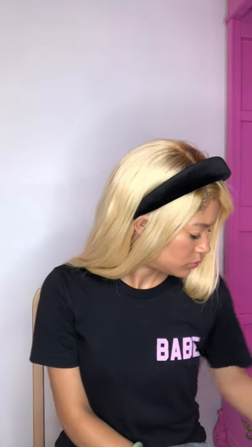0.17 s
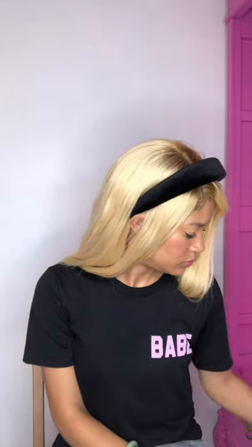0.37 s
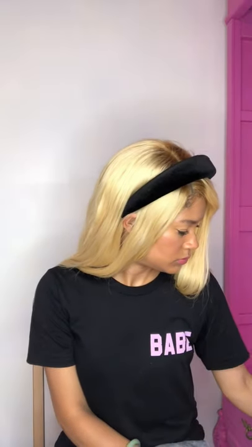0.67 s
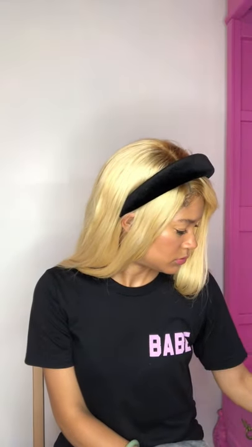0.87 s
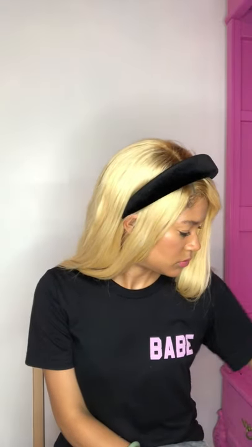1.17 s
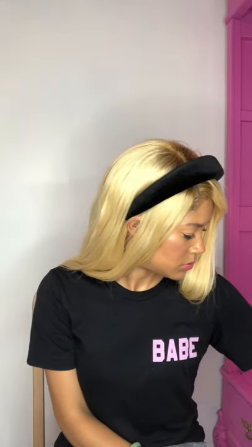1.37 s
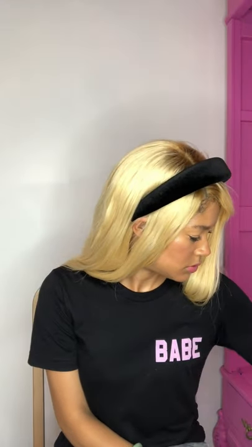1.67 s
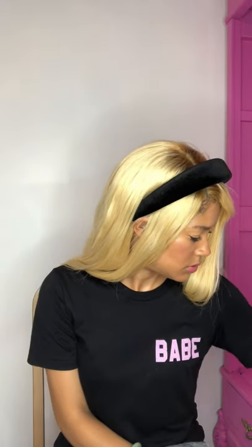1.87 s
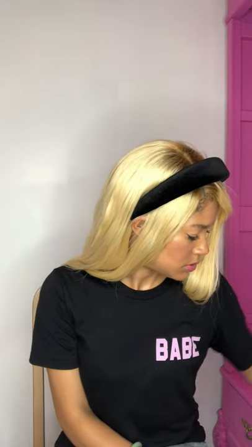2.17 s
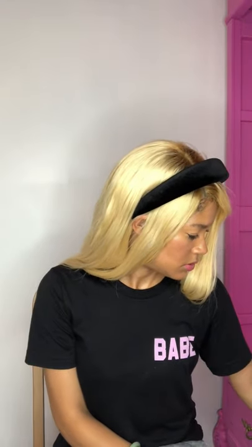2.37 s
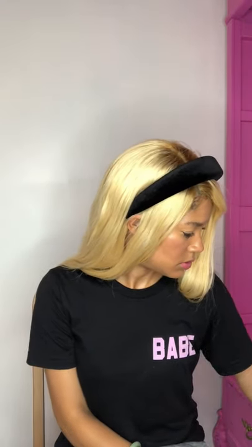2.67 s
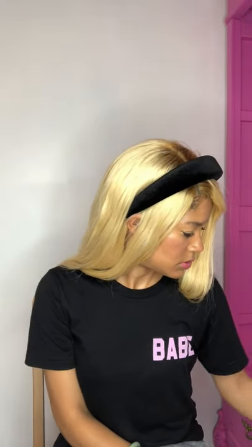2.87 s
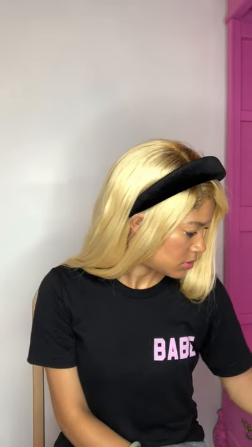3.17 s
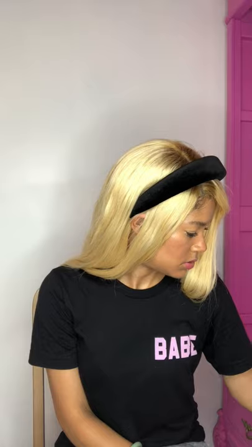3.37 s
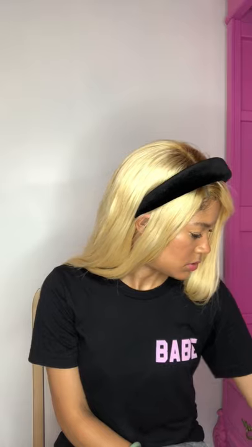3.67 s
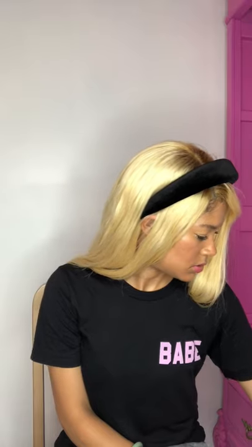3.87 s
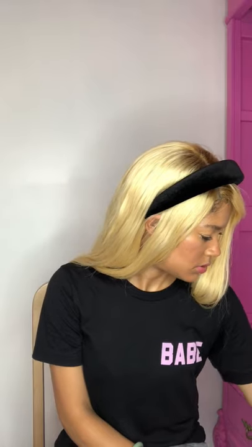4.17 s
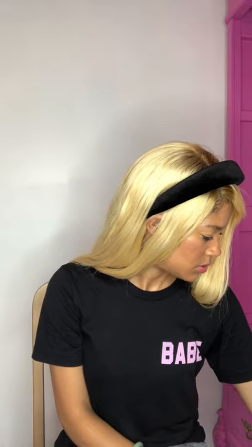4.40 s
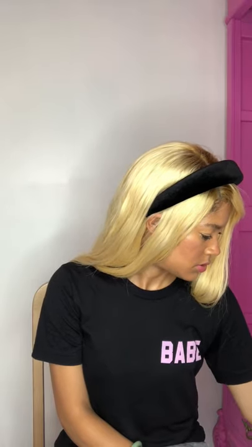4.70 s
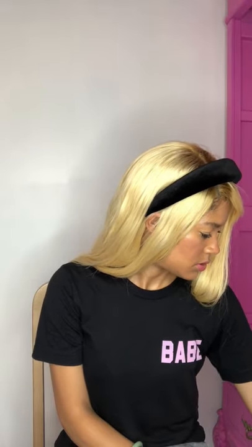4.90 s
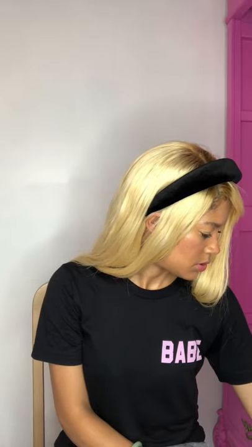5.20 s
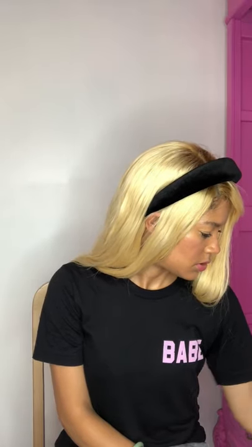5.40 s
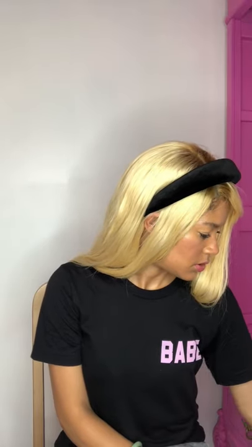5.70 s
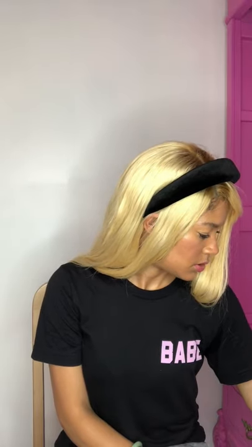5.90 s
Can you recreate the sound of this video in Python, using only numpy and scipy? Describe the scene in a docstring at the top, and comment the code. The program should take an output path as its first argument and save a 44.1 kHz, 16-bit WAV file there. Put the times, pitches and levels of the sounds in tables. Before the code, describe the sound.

A hand works at a small fridge. After light touches, a hard crack rings its panels and hollow cabinet, with about a second of bright room tail. Groups of knocks, scrapes, packet rustles and tiny hard ticks follow, separated by near-quiet pauses. The second big cluster peaks in a firm thump, and the last ends in crisp crinkling. Quiet air hiss and wavering low hum continue, heard at moderate distance.

```python
"""A bare, ringing room: a hand opens a small fridge and moves things about inside it.
Knocks are decaying modes of the struck thing, panels and hollow cabinet, rung by runs of contacts.
Random stick-slip grains make things slide, rustle and crinkle; small hard items tick in noise-like snaps.
Band-by-band dying noise is the room's tail of about a second; filtered noise is the low hum and quiet hiss."""
import sys
import numpy as np
from scipy import signal
from scipy.fft import rfft, irfft, next_fast_len
from scipy.io import wavfile

SR = 44100
rng = np.random.default_rng(int(sys.argv[2]) if len(sys.argv) > 2 else 0)


def bounce(signal):
    """Save signal as a 16-bit WAV file at the path given by the first command-line argument."""
    frames = np.transpose(np.atleast_2d(signal))
    limited = np.clip(frames, -1, 1)
    pcm = np.round(limited * 32767).astype(np.int16)
    wavfile.write(sys.argv[1], SR, pcm)


def voltage_ratio(decibels):
    """Convert decibels (scalar or array-like) to amplitude ratios, 20 dB per decade."""
    exponent = np.asarray(decibels, float) / 20
    return 10 ** exponent


N = 266628
LEAD = round(0.3 * SR)   # samples computed ahead of the start

# cabinet panel modes: (frequency [Hz], relative level [dB], t60 [s])
PANEL_MODES = [(620, -0.5, 0.012), (774.6, 5.5, 0.014), (796.3, 2.5, 0.025), (1038, -5.5, 0.014),
               (1165, -1.5, 0.015), (1218, -4, 0.028), (1440, -5, 0.016), (1520, -7, 0.015),
               (1797, -7, 0.0092), (1919, -15.5, 0.03), (2120, -24, 0.0067), (2220, -20, 0.0043)]


def rms_one(x):
    """Scale to rms 1."""
    return x / np.sqrt(np.mean(x ** 2) + 1e-20)


def peak_one(x):
    """Scale to peak 1."""
    return x / np.max(np.abs(x))


def loud_one(x):
    """Scale so that the energy equals that of 20 ms at rms 1."""
    return x / np.sqrt(np.sum(x ** 2) / (0.02 * SR))


def at_hz(points, hz):
    """Read a (frequency, value) table on a log-frequency axis."""
    table_hz, values = np.array(points).T
    return np.interp(np.log(hz), np.log(table_hz), values)


def coloured(x, spectrum):
    """Filter x by a (Hz, dB) table; padded against wrap-round."""
    size = next_fast_len(len(x) + 512)
    hz = np.maximum(np.arange(size // 2 + 1) * SR / size, 1)
    return irfft(rfft(x, size) * voltage_ratio(at_hz(spectrum, hz)), size)[:len(x)]


def drift(knots_per_s):
    """Slow chance: straight lines between normal random knots."""
    knots = rng.standard_normal(400)
    return np.interp(np.arange(N) / SR * knots_per_s, np.arange(400), knots)


def resonance(x, hz, width_hz):
    """Two-pole resonance with gain 1 on top."""
    r = np.exp(-np.pi * width_hz / SR)
    poles = [1, -2 * r * np.cos(2 * np.pi * hz / SR), r * r]
    return signal.lfilter([(1 - r * r) / 2, 0, (r * r - 1) / 2], poles, x)


def contacts(luck, decay_s):
    """A dying run of contacts: chance phases of a dying noise, even strength at every pitch."""
    t = np.arange(len(luck)) / SR
    tones = rfft(luck * voltage_ratio(-60 * t / decay_s))
    even = irfft(tones / np.abs(tones), len(t))
    onset = np.minimum(t / (0.046 * decay_s), 1)
    return even * voltage_ratio(-60 * t / (3 * decay_s)) * onset


def struck(modes, luck, touch):
    """Decaying sine modes of chance strengths, rung by a touch."""
    t = np.arange(len(touch)) / SR
    hz, db, t60_s = np.array(modes).T[:, :, None]
    chance_db = 2.0 * luck[:len(modes), None]
    rings = voltage_ratio(db + chance_db - 60 * t / t60_s) * np.sin(2 * np.pi * hz * t)
    # neighbours alternate in sign, so the valleys between them stay filled
    signs = (-1) ** np.arange(len(modes))[:, None]
    return loud_one(signal.fftconvolve((signs * rings).sum(axis=0), touch)[:len(t)])


def grains(per_s, spread_db):
    """Dense random contacts of uneven size and random sign."""
    sizes = voltage_ratio(spread_db * np.minimum(rng.exponential(1, N), 4)) * rng.choice([-1, 1], N)
    return sizes * (rng.random(N) < per_s / SR) + 1e-18


def strokes(rows):
    """Two gains: each stroke swells by 20 dB to its peak, then fades by 20 dB; powers add."""
    powers, t = np.zeros((2, N)), np.arange(N) / SR
    for s, swell_s, fade_s, *levels_db in rows:
        before = (s - t) / max(swell_s, 0.002)
        after = (t - s) / max(fade_s, 0.002)
        shape = voltage_ratio(-20 * np.maximum(before, after))
        powers += (voltage_ratio(np.array(levels_db))[:, None] * shape) ** 2
    return np.sqrt(powers)


def add(out, s, sound):
    """Mix a sound in at second s of a line that starts LEAD samples early."""
    at = max(LEAD + round(s * SR), 0)
    out[at:at + len(sound)] += sound[:len(out) - at]


def knocks():
    """The crack is the contact itself; panels answer, then the struck thing rings and the cabinet booms."""
    # (time [s], struck thing's ring [dB], its pitch [Hz], panel clack [dB], crack [dB])
    knock_rows = [(-0.3, -28, 288, -41, -50), (0.611, -58, 377, -60.5, -70.5),
                  (0.707, -40, 333, -55.5, -81), (0.895, -39.5, 348, -55.5, -77),
                  (0.918, -40.5, 321, -65, -81), (1.088, -49, 219, -79, -79), (1.12, -47, 230, -67, -80),
                  (1.3708, -17, 511, -25.5, -29.5), (1.874, -45, 746, -48.5, -63),
                  (1.957, -23, 350, -36.5, -49), (2.1519, -28.5, 1219, -43, -39),
                  (2.169, -36, 374, -43, -45), (2.206, -30.5, 303, -47, -53), (2.235, -34, 360, -43, -49.5),
                  (2.269, -35.5, 228, -44.5, -49), (2.308, -39, 219, -56, -63), (2.348, -37, 352, -54, -61),
                  (2.491, -49, 300, -49.5, -59), (2.537, -44, 227, -65, -56),
                  (2.548, -39.5, 473, -58.5, -60), (3.783, -57, 306, -62, -67),
                  (3.812, -41.5, 172, -55, -61.5), (3.841, -49, 180, -68, -64),
                  (3.872, -35, 170, -45, -45.5), (3.895, -38, 641, -45.5, -58),
                  (3.91, -38, 298, -49.5, -55), (3.935, -38.5, 379, -49, -62),
                  (3.983, -42, 386, -43.5, -44), (3.993, -40, 1135, -46, -75),
                  (4.111, -41.5, 1117, -46.5, -60), (4.121, -57.5, 510, -56, -73),
                  (4.199, -55, 1157, -54.5, -76.5), (4.214, -41.5, 1174, -62, -51.5),
                  (4.256, -25, 414.5, -40.5, -41.5), (4.284, -41, 385, -67, -54.5),
                  (4.319, -36.5, 302, -49, -62), (4.362, -40, 353, -65, -70),
                  (4.433, -34.5, 346.5, -46.5, -58), (4.452, -37, 367, -61, -72),
                  (5.008, -60, 180, -60.5, -74.5), (5.108, -53, 384, -66, -74),
                  (5.148, -50.5, 497, -56.5, -63), (5.165, -42.5, 834, -52.5, -60),
                  (5.361, -54, 414, -68, -74), (5.416, -46.5, 810, -58, -63.5),
                  (5.487, -64, 1180, -71, -77), (5.511, -41.5, 417, -51, -58),
                  (5.527, -30.5, 412, -38.5, -51.5), (5.549, -39.5, 385, -44, -54.5),
                  (5.731, -46, 223, -73, -64), (5.747, -39.5, 231, -68, -59), (5.929, -61, 750, -39, -56),
                  (5.939, -48, 1200, -42.5, -59), (5.951, -47.5, 327, -49.5, -69)]
    # hollow cabinet modes: (frequency [Hz], relative level [dB], t60 [s])
    boom_modes = [(129.6, -16, 0.066), (180, -2, 0.078), (248.6, -5, 0.11), (346, 8.5, 0.069),
                  (385, 7.5, 0.14), (430.5, 5.5, 0.13), (516, 8, 0.13)]
    # contact spectrum: (frequency [Hz], relative level [dB per Hz])
    crack_spectrum = [(1200, -4.5), (2000, 4.5), (3000, -2), (5000, -7.5), (8000, -16.5), (12000, -24.5),
                      (16000, -38.5)]
    chatter_s, crack_t60_s = 0.031, 0.17   # contact decay; extra damping of the crack
    ring_t60_s, ring_lag_s = 0.066, 0.0018   # t60 at 400 Hz; delay of ring and boom
    boom_under_ring_db, soft_cut_hz = 10.5, 3600
    out, t = np.zeros(N + LEAD), np.arange(4096) / SR
    lucks = rng.standard_normal((len(knock_rows), len(t)))
    for (s, ring_db, ring_hz, clack_db, crack_db), luck in zip(knock_rows, lucks):
        # gentle knocks land slower and smear
        softness = np.clip(voltage_ratio(0.99 * (-39 - clack_db)), 1, 3)
        touch = contacts(luck, softness * chatter_s)
        crack = loud_one(coloured(touch * voltage_ratio(-60 * t / crack_t60_s), crack_spectrum))

        # a soft landing dulls the panels
        cut_hz = soft_cut_hz / softness ** 2
        dull = signal.lfilter([1], [1, -np.exp(-2 * np.pi * cut_hz / SR)], touch)
        clack = struck(PANEL_MODES, luck[40:], dull)
        add(out, s, voltage_ratio(crack_db) * crack + voltage_ratio(clack_db) * clack)

        # low modes feel the contacts as one rounded push
        push = t * np.exp(-t / (0.02 * chatter_s))
        # the struck thing takes a few cycles to sing; higher ones die sooner
        swell = 1 - np.exp(-(t / (0.0022 * softness)) ** 2)
        ring_mode = (ring_hz, 0, ring_t60_s * (400 / ring_hz) ** 0.64)
        ring = peak_one(swell * struck([ring_mode], luck, push))
        boom = voltage_ratio(-boom_under_ring_db) * struck(boom_modes, luck[20:], push)
        add(out, s + ring_lag_s, voltage_ratio(ring_db) * (ring + boom))
    # a small cabinet radiates little bass
    return signal.sosfilt(signal.butter(4, 115, "high", fs=SR, output="sos"), out)


def shoves():
    """Things slide along the shelves: stick-slip contacts ring the panel modes and rock the cabinet."""
    # (time of peak [s], swell [s], fade [s], drag [dB], cabinet rocking [dB])
    shove_rows = [(0.89, 0.016, 0.13, -67.5, -62), (1.93, 0.063, 0.052, -44.5, -59),
                  (1.975, 0.011, 0.035, -41, -61), (2.04, 0.13, 0.13, -63, -58),
                  (2.2, 0.054, 0.19, -41.5, -50), (2.3, 0.18, 0.032, -54, -49), (2.4, 0.067, .15, -69, -78),
                  (2.535, 0.057, 0.12, -53, -81), (2.94, .2, 0.055, -68.5, -65), (3.05, .1, .3, -78, -67),
                  (3.826, .08, 0.09, -60, -52), (3.9, 0.077, 0.27, -49.5, -55),
                  (4.02, 0.2, 0.059, -51.5, -72), (4.12, 0.11, 0.18, -52, -75),
                  (4.25, 0.03, .012, -43.5, -62), (4.275, 0.0069, 0.031, -37.5, -44),
                  (4.48, 0.18, 0.12, -56, -59), (5.18, 0.056, 0.047, -54, -56),
                  (5.56, 0.057, 0.079, -45.5, -72), (5.648, .15, .05, -52.5, -64),
                  (5.725, .04, .3, -60.5, -70)]
    slips = grains(per_s=2700, spread_db=3.5)
    rock = resonance(resonance(slips, 107, width_hz=20), 140, width_hz=87)
    drag = np.zeros(N)
    for k, (hz, db, t60_s) in enumerate(PANEL_MODES):
        drag += voltage_ratio(db) * (-1) ** k * rms_one(resonance(slips, hz, 2.1 / t60_s))
    drag_gain, rock_gain = strokes(shove_rows)
    return np.pad(drag_gain * rms_one(drag) + rock_gain * rms_one(rock), (LEAD, 0))


def rustles():
    """Packets brushed: fine contacts rustle and crinkle in the treble."""
    # (time of peak [s], swell [s], fade [s], rustle [dB], crinkle [dB])
    brush_rows = [(1.298, .07, 0.28, -74, -81.5), (1.95, 0.11, .06, -58.5, -84),
                  (2.0, .06, 0.091, -59.5, -86), (2.204, .04, 0.11, -49.5, -76),
                  (2.4, 0.088, 0.12, -75, -73.5), (2.502, 0.017, 0.061, -59, -61),
                  (2.936, .3, 0.23, -75, -77), (3.14, 0.11, 0.27, -87, -75.5), (3.7, 0.2, .1, -80, -75),
                  (3.8, .07, 0.1, -66.5, -79), (3.86, 0.04, 0.074, -63, -70),
                  (4.05, .25, 0.061, -58.5, -85), (4.206, 0.011, 0.049, -47.5, -80),
                  (4.275, .03, 0.029, -47.5, -66), (4.48, 0.35, .12, -74, -73),
                  (5.56, .08, 0.2, -66.5, -96), (5.706, 0.006, 0.047, -56, -62),
                  (5.75, .04, 0.054, -56, -60.5), (5.787, 0.035, 0.024, -43.5, -54),
                  (5.835, .03, 0.059, -58, -71)]
    # spectra: (frequency [Hz], relative level [dB per Hz])
    rustle_spectrum = [(1200, -9), (2000, 3), (3000, 7.5), (4200, 6), (6000, -5), (9000, -46)]
    crinkle_spectrum = [(4000, -22), (7000, -8), (10000, -15.5), (14000, -13), (16000, -12)]
    fine = grains(per_s=2400, spread_db=-0.5)
    rustle = rms_one(coloured(fine, rustle_spectrum))
    crinkle = rms_one(coloured(fine, crinkle_spectrum))
    rustle_gain, crinkle_gain = strokes(brush_rows)
    return np.pad(rustle_gain * rustle + crinkle_gain * crinkle, (LEAD, 0))


def ticks():
    """Small hard items: a snap of a few milliseconds, each with its own lean to dull or bright."""
    # (time [s], peak [dB], dull part [dB], middle part [dB]); parts against the bright part
    tick_rows = [(0.602, -60, 24, 9), (0.6145, -52.5, 5, 17), (1.6572, -50.5, 15, 9), (1.6934, -52, 14, 5),
                 (1.731, -54, 7, 3), (1.7445, -64, 11, 9), (1.8103, -51.5, -3, -0.5),
                 (2.2166, -33.5, 31, 18), (2.3436, -44.5, -12, 15), (2.48, -47, 9.5, 7), (2.491, -54, 0, 0),
                 (2.633, -62, -1, -5), (2.8225, -55.5, 1.5, 3), (2.9946, -58, 15, 4), (3.1294, -66, 9, -8),
                 (3.7484, -57, 17, 7), (3.7843, -54, 14, -1.5), (3.928, -42, 46, 27), (4.3635, -47, 7, 10),
                 (4.4752, -51, 11, 0), (5.1481, -49, 9, 9), (5.1535, -42, -1, 9), (5.218, -63, 2.5, -9),
                 (5.2474, -56, -15, -6), (5.5942, -53, 12, 9), (5.6244, -62, 18, 12),
                 (5.7049, -35, 29.5, 33)]
    out = np.zeros(N + LEAD)
    lucks = rng.standard_normal((len(tick_rows), 2048))
    for (s, db, dull_db, mid_db), luck in zip(tick_rows, lucks):
        colour = [(1200, dull_db - 38), (3500, dull_db), (6500, mid_db), (12500, 0)]
        snap = contacts(luck, decay_s=0.027)
        add(out, s, voltage_ratio(db) * peak_one(coloured(snap, colour)))
    return out


def room(x):
    """Dense echoes as noise that dies band by band, after a short gap."""
    # (frequency [Hz], t60 [s])
    decay_t60 = [(100, 0.95), (300, 0.64), (1000, 1.21), (3000, 1.06), (8000, 0.83), (15000, .35)]
    # first echoes of a band: (frequency [Hz], relative level [dB])
    echo_tone = [(100, -21.5), (300, -17), (1000, -19.5), (3000, -19), (8000, -19), (15000, -18.5)]
    edges_hz = 25 * 2 ** np.arange(0, 9.6, 1 / 3)
    t = np.arange(round(1.2 * SR)) / SR
    white, echoes = rng.standard_normal((2, len(t))), np.zeros(len(t))
    for k, (low, high) in enumerate(zip(edges_hz, edges_hz[1:])):
        hz = np.sqrt(low * high)
        third_octave = signal.butter(2, [low, high], "band", fs=SR, output="sos")
        band = signal.sosfilt(third_octave, white[k % 2])   # neighbours use different noise
        echoes += band * voltage_ratio(at_hz(echo_tone, hz) - 60 * t / at_hz(decay_t60, hz))
    onset = np.clip(t / 0.0014 - 0.3, 0, 1)
    return signal.fftconvolve(x, 0.11 * echoes * onset)[:len(x)]


def murmur(handled):
    """A wavering hum near 240 Hz, of filtered noise, that swells after things are handled."""
    rest_db, stirred_db, lag_s = -62.5, -4, 0.059   # stirred_db: against the handling's bass
    r = np.exp(-1 / (lag_s * SR))
    bass_power = resonance(handled, 240, width_hz=122) ** 2
    stirred = signal.sosfilt([[1 - r, 0, 0, 1, -r, 0]] * 2, bass_power)[LEAD:]
    hum = resonance(resonance(rng.standard_normal(N), 228, width_hz=70), 236, width_hz=740)
    gain = np.sqrt(voltage_ratio(2 * rest_db) + voltage_ratio(2 * stirred_db) * stirred)
    return gain * voltage_ratio(3.8 * drift(knots_per_s=14)) * rms_one(hum)


def air():
    """Quiet hiss and rumble, a treble hiss and a deep hum, all of filtered noise."""
    # spectra: (frequency [Hz], relative level [dB per Hz])
    air_spectrum = [(41, -1), (70, -9.5), (86, -17.5), (129, -1.5), (197, -21), (247, -16), (363, -22),
                    (482, -10.5), (579, -24), (943, -25), (1390, -26.5), (1740, -28), (9000, -36.5),
                    (11700, -68), (19800, -120)]
    top_spectrum = [(6000, -27.5), (8500, -51), (9500, 2.5), (10200, 2.5), (11000, -2.5), (16000, -4.5)]
    air_db, top_db, hum_db, hum_hz = -64.5, -83.5, -70.5, 55
    hiss = rms_one(coloured(rng.standard_normal(N), air_spectrum))
    hiss_gain = voltage_ratio(air_db + 0.23 * drift(knots_per_s=5.2))
    top = rms_one(coloured(rng.standard_normal(N), top_spectrum))
    deep = resonance(resonance(rng.standard_normal(N), hum_hz, width_hz=4), hum_hz, width_hz=34.5)
    return hiss_gain * hiss + voltage_ratio(top_db) * top + voltage_ratio(hum_db) * rms_one(deep)


def scene():
    """Everything handled sounds direct and through the room, over hum and air."""
    handled = knocks() + shoves() + rustles() + ticks()
    return ((handled + room(handled))[LEAD:] + murmur(handled) + air())[None]


def band_limit(x):
    """A steep low-pass at the top of the band."""
    return signal.sosfilt(signal.butter(12, 16520, fs=SR, output="sos"), x)


def record(dry):
    """The microphone drops the deepest bass."""
    heard = signal.sosfilt(signal.butter(6, 44, "high", fs=SR, output="sos"), dry)
    return band_limit(heard)


dry = scene()
out = record(dry)
bounce(out)
```